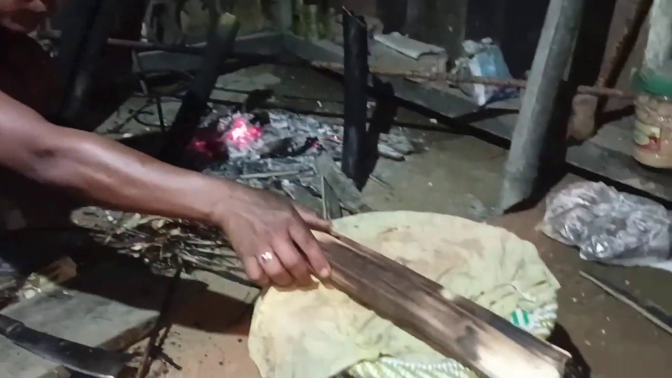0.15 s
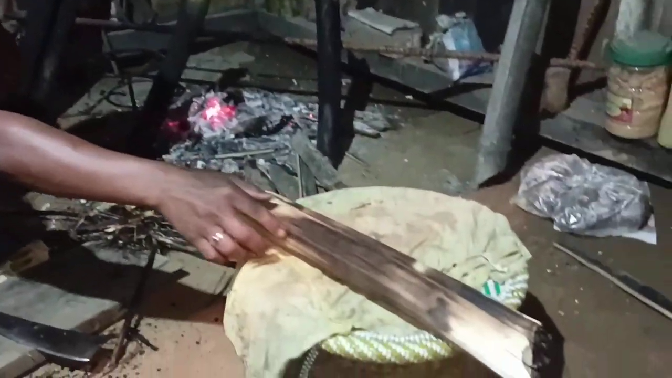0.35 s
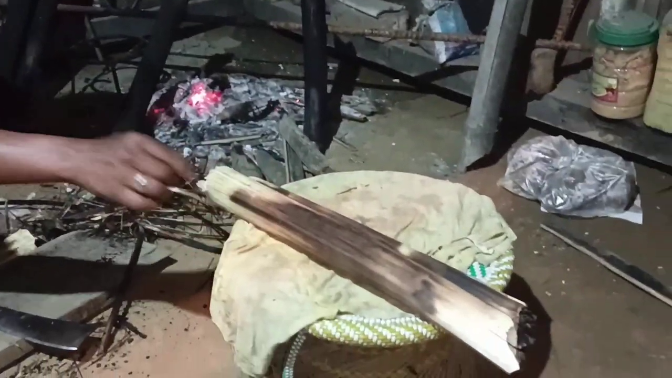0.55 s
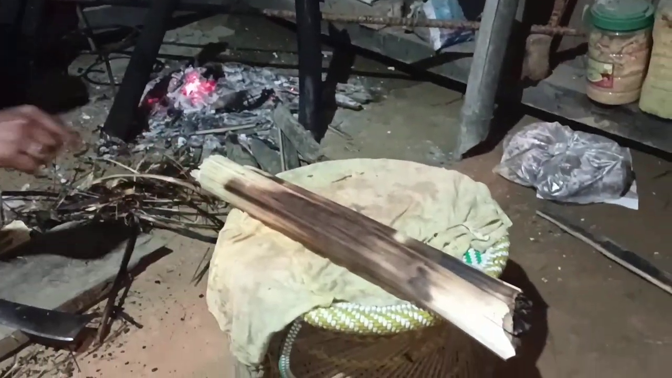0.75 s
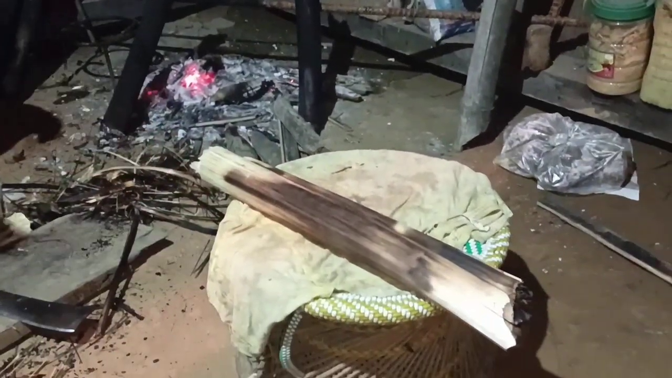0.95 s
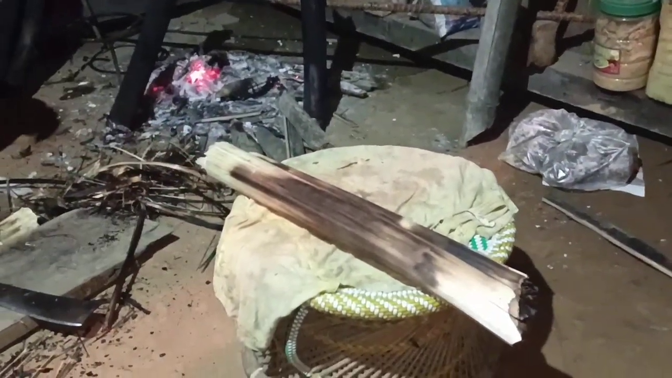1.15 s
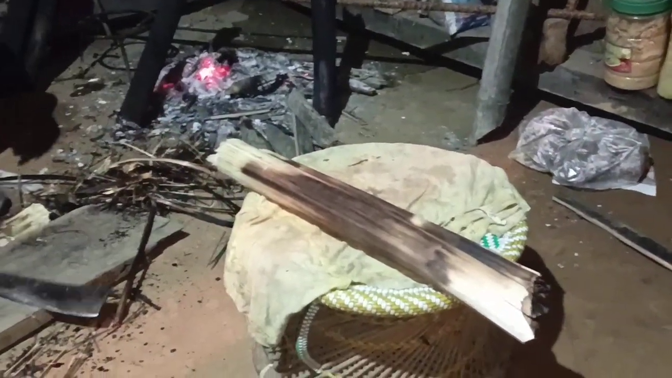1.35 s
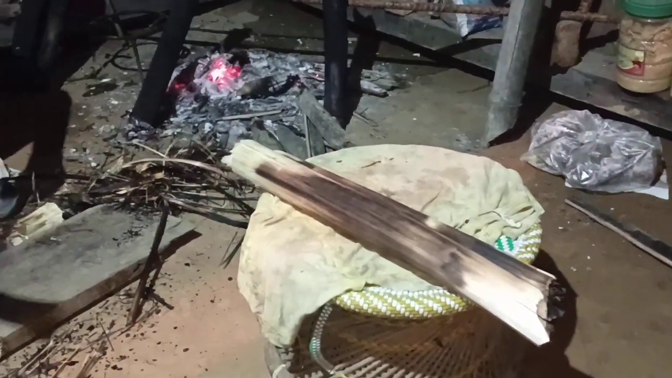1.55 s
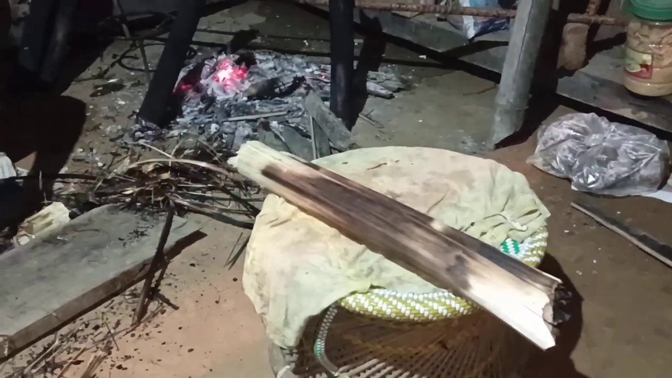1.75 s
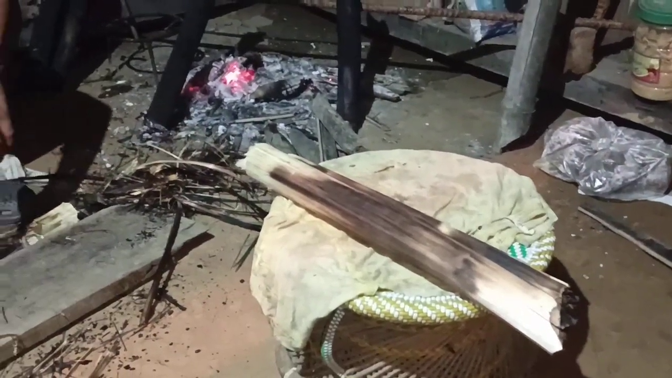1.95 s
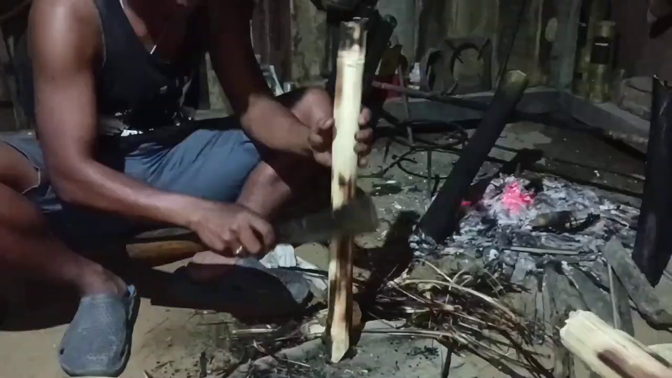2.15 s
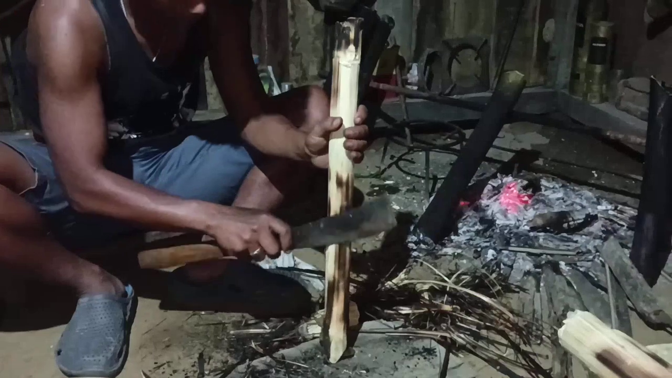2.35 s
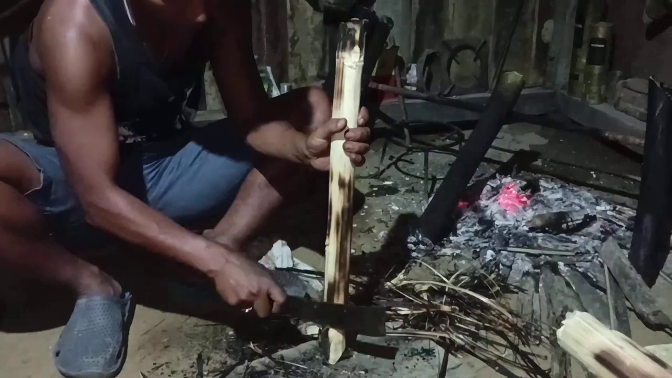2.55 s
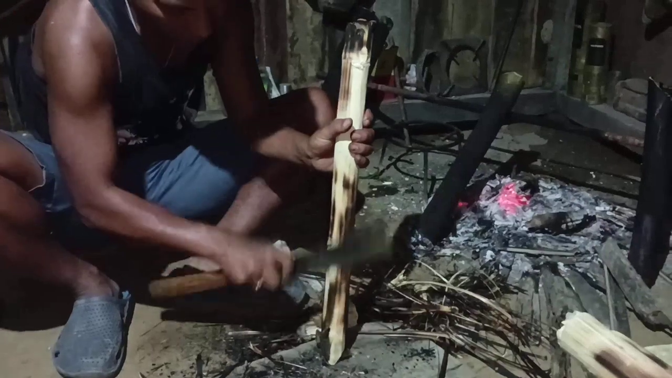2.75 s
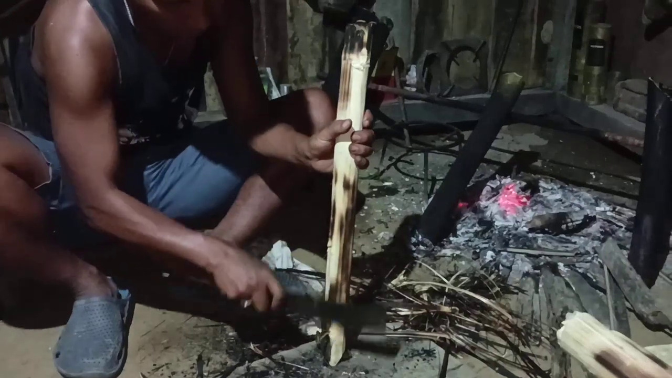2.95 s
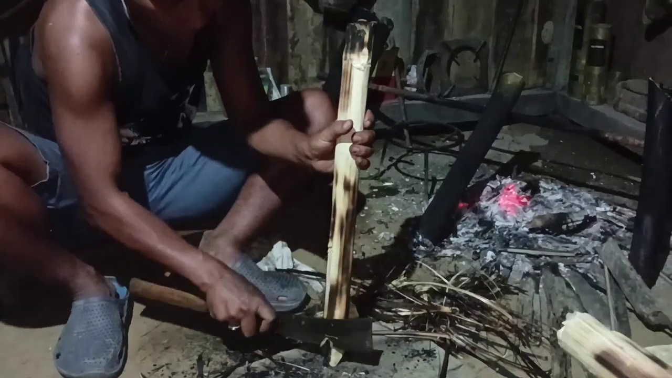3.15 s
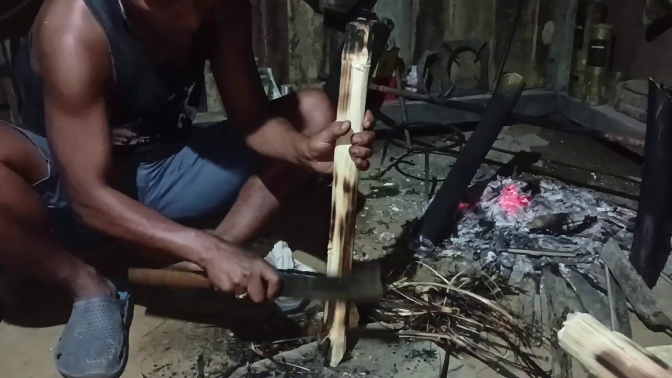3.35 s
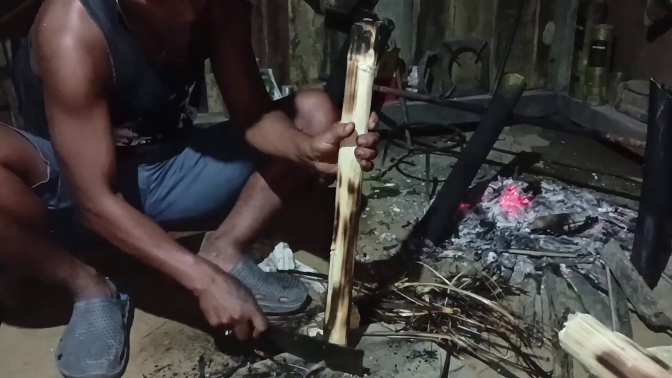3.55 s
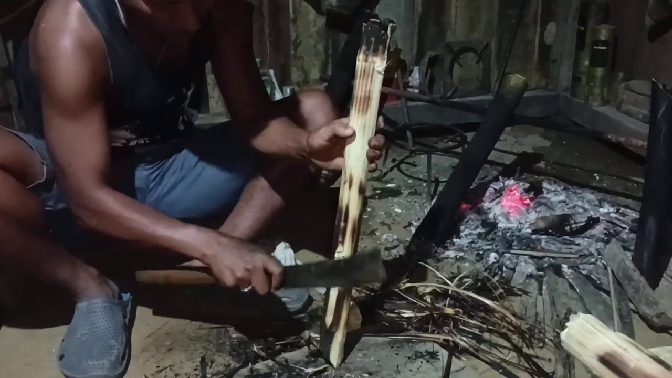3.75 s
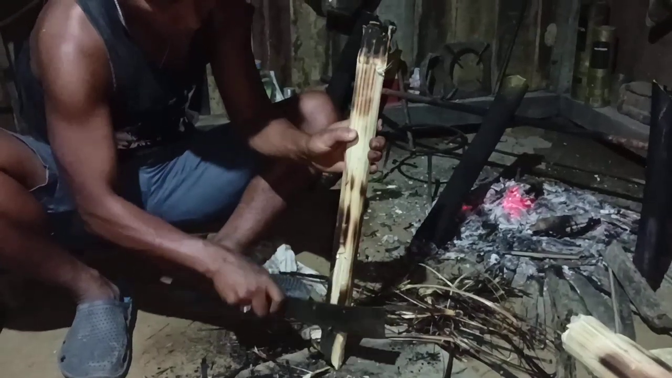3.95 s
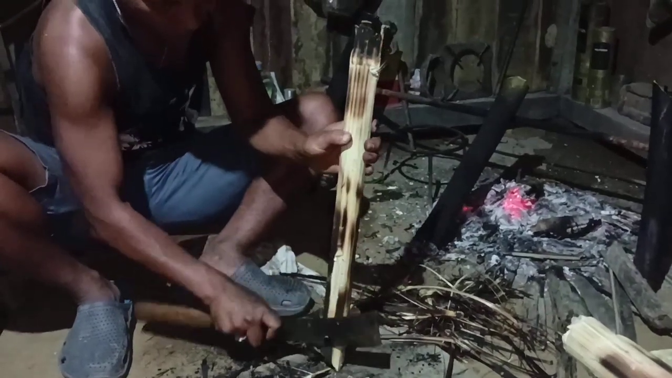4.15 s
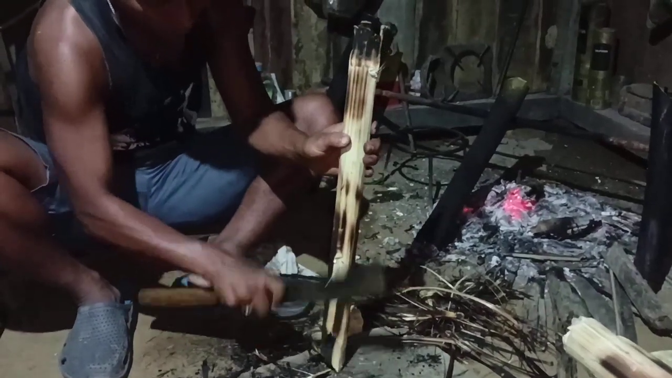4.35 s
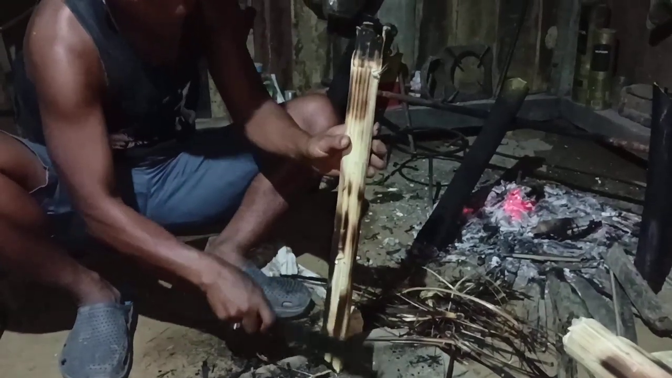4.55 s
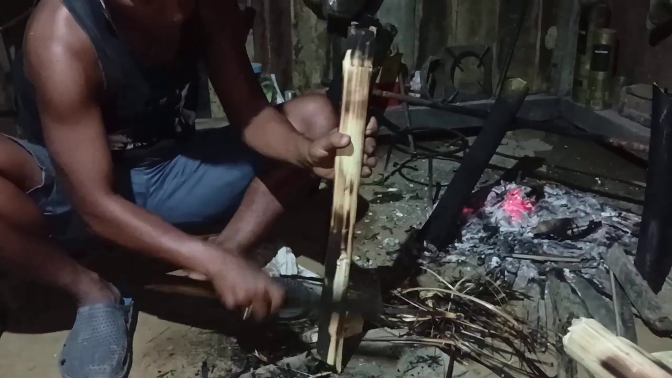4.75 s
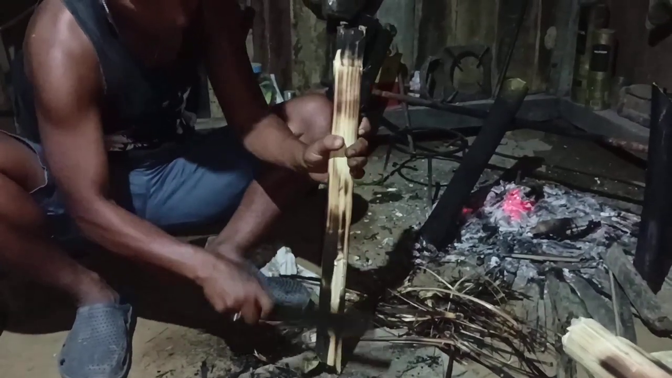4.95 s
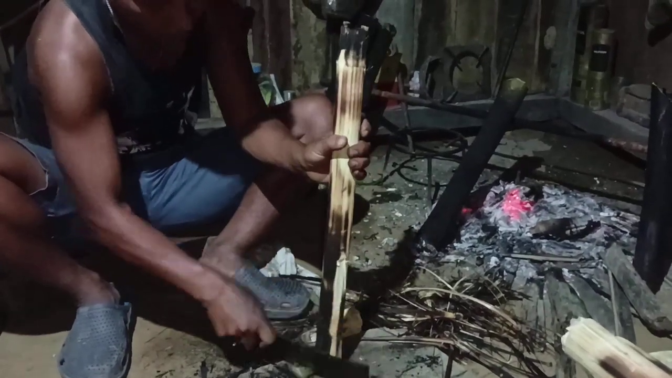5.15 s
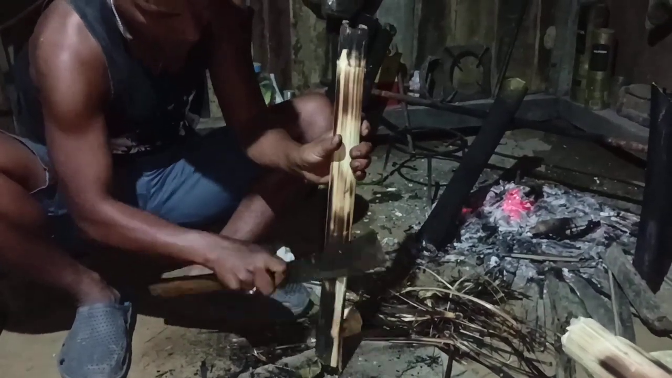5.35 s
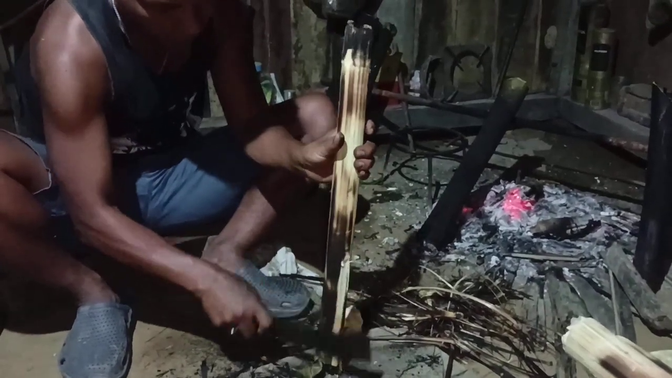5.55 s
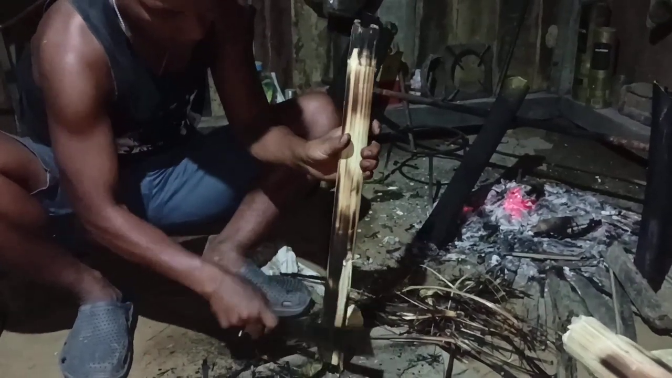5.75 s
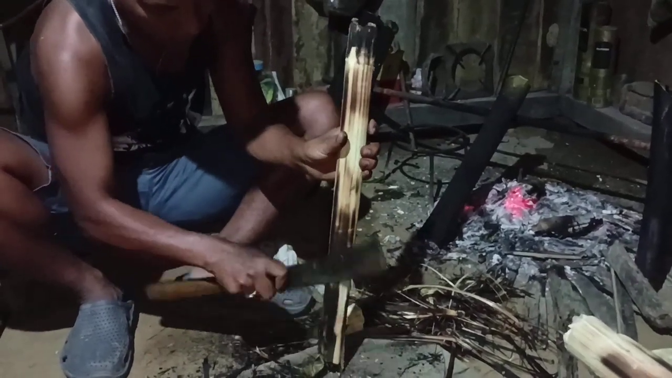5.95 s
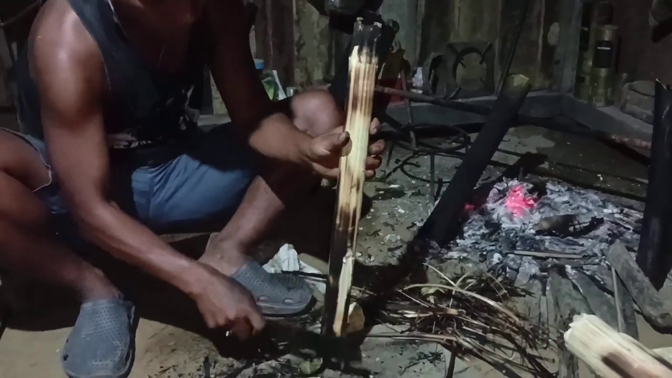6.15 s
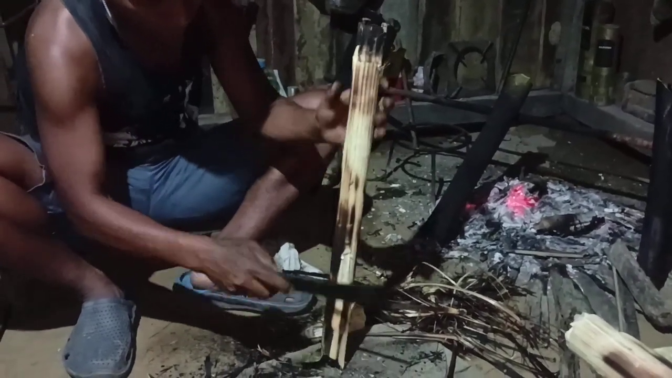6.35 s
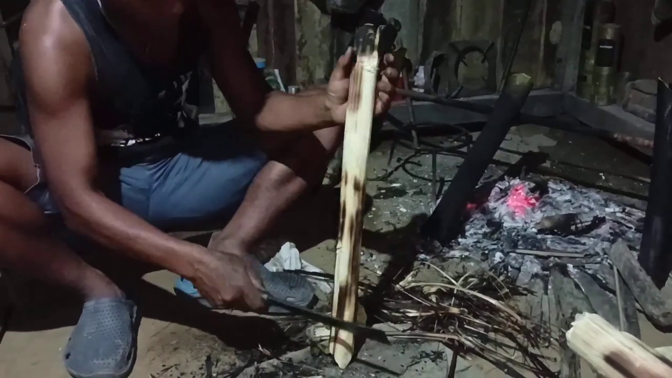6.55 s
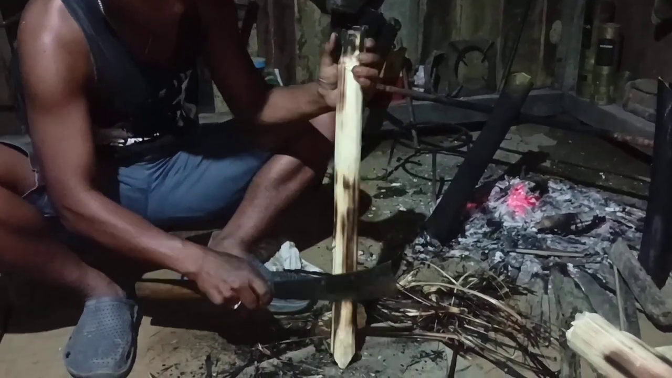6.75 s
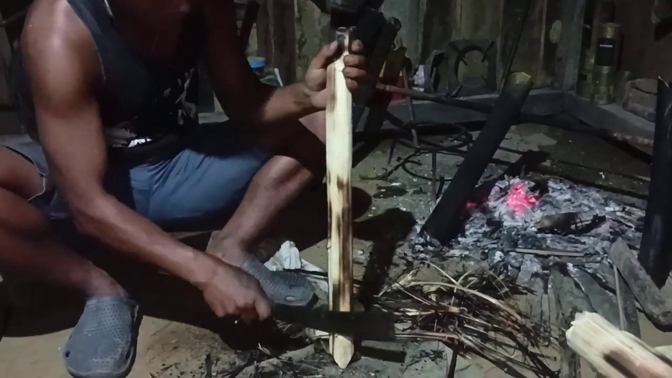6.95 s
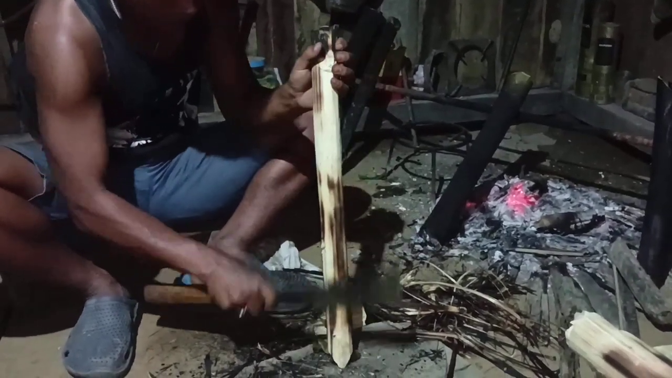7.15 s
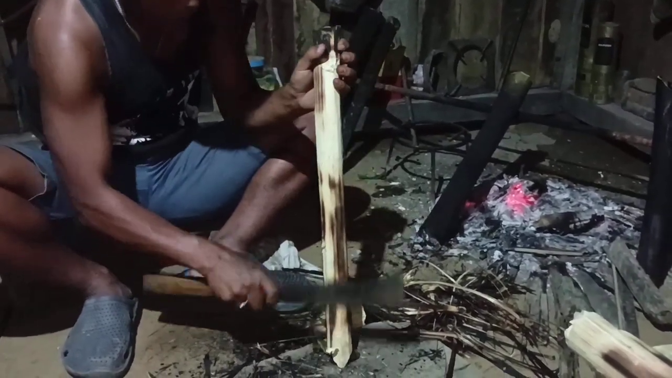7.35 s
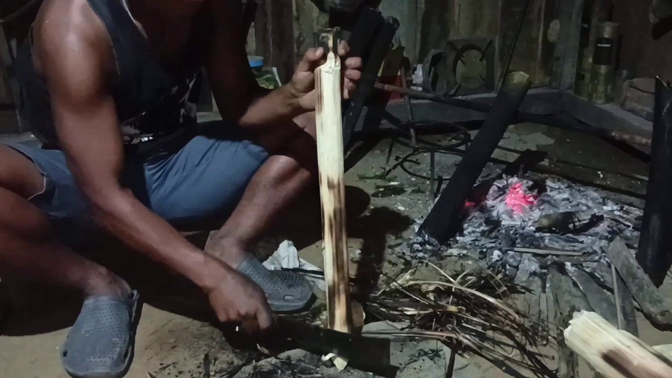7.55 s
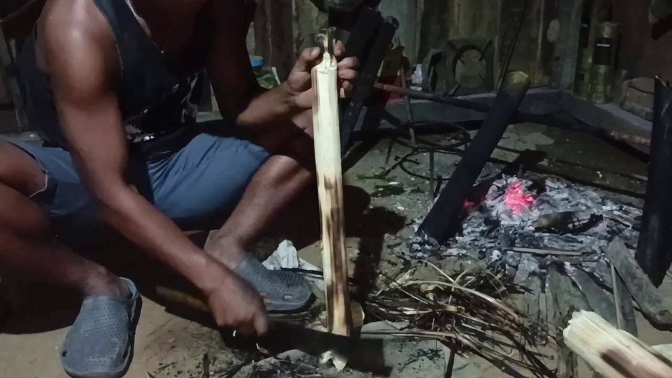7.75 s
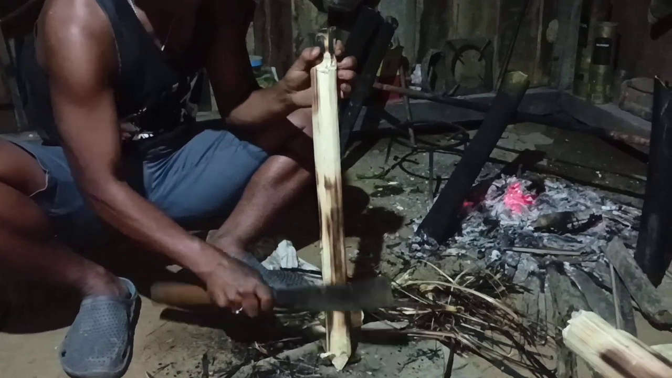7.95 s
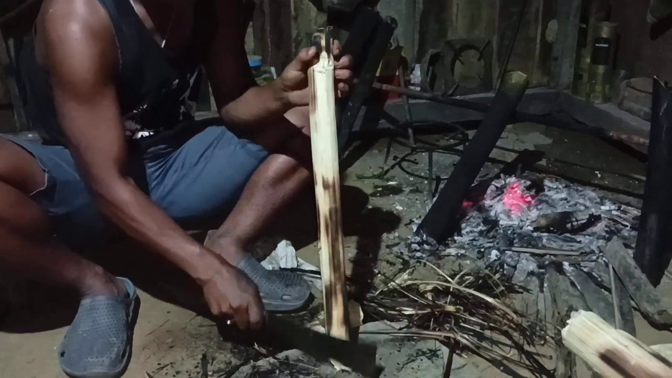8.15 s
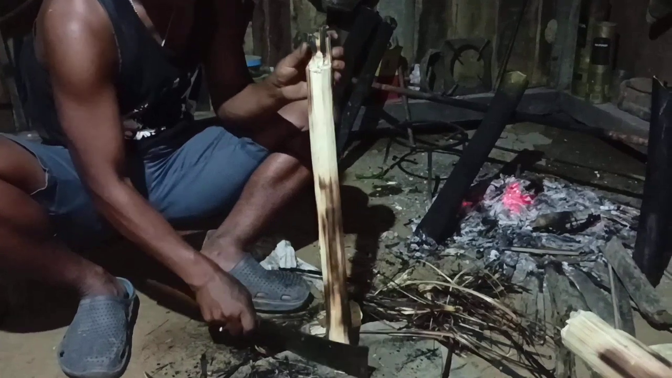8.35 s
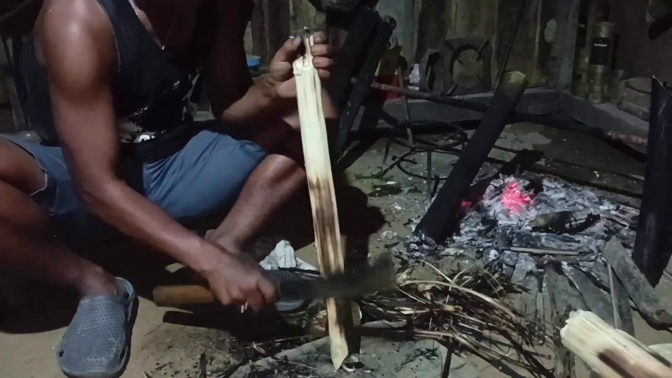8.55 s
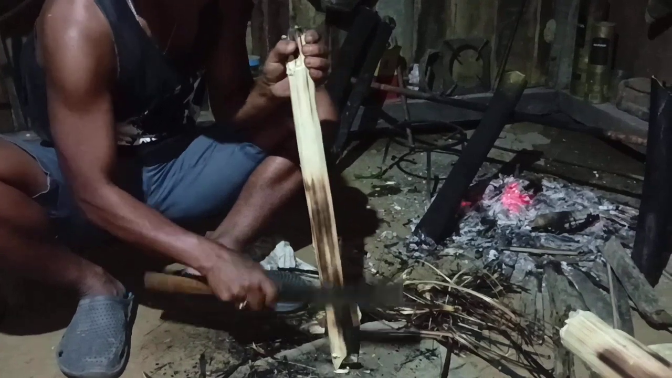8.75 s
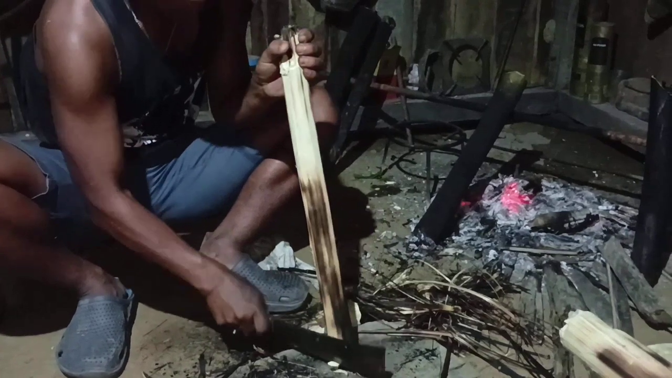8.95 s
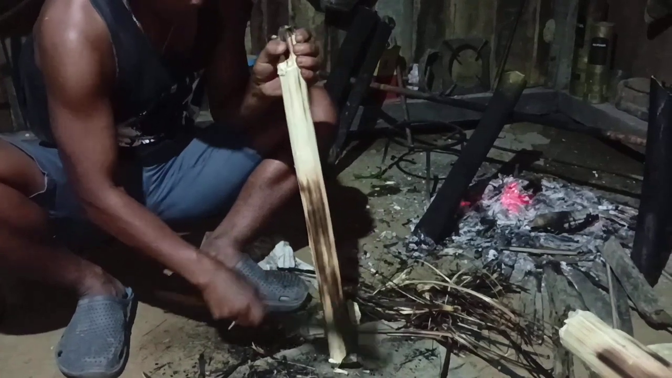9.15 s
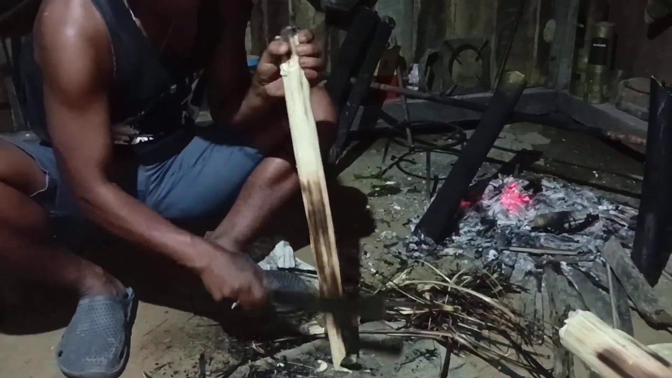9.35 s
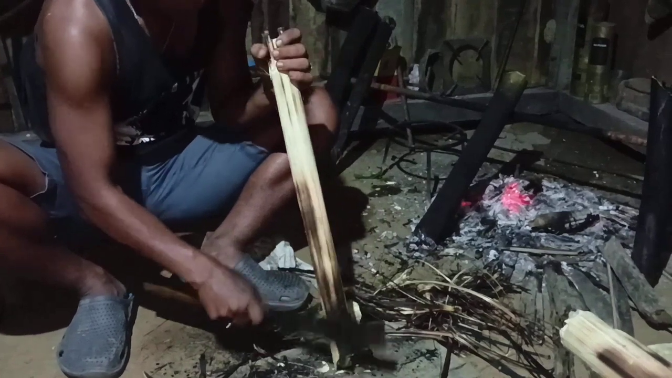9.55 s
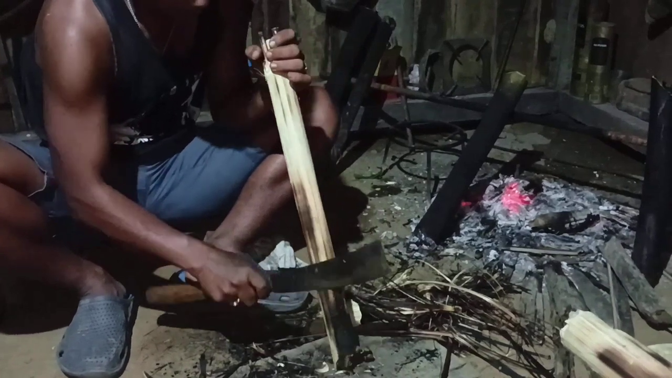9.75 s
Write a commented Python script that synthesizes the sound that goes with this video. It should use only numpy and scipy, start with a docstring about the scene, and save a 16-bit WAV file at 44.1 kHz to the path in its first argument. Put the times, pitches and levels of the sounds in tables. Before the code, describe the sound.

A heavy knife strips charred skin from a bamboo tube. After one opening knock, quiet, and a dropped-blade clank, there is a moment of complete silence; then irregular scrapes swell into dry cracks and woody hollow knocks, several very loud and clipped. The blade faintly sings, rice inside dampens the tube, and blows thud into the ground. Close microphone, small shelter, thin unsteady outdoor air.

```python
"""A large knife shaves charred skin off a bamboo tube on hard earth under a shelter: swelling scrapes of torn-fibre noise.
Blows crack the skin, ring the hollow tube's modes, shake the rice inside and thud; the hardest overload the microphone.
The knife is dropped once, ringing as steel, just before a short silence; a few soft bumps fall before that.
Behind lies the yard: unsteady airy hiss, far rumble and faint treble rustles, all shaped noise."""
import sys
import numpy as np
from scipy import signal
from scipy.fft import rfft, irfft, next_fast_len
from scipy.io import wavfile
from scipy.ndimage import uniform_filter1d, map_coordinates

SR = 44100
rng = np.random.default_rng(int(sys.argv[2]) if len(sys.argv) > 2 else 0)


def generate_wav(sig):
    """Save sig (samples, or channels by samples) to the path in sys.argv[1] as 16-bit PCM at SR."""
    pcm = np.round(np.clip(np.atleast_2d(sig).T, -1, 1) * 32767).astype(np.int16)
    wavfile.write(sys.argv[1], SR, pcm)


N = 436590


def amp(db):
    """Gain of a level in dB."""
    return 10 ** (np.asarray(db) / 20)


def decay(t, t60):
    """Exponential decay by 60 dB in t60 seconds."""
    return amp(-60 * t / t60)


def build_up(t, seconds):
    """Rise from 0 towards 1 with a time constant in seconds."""
    return 1 - np.exp(-t / seconds)


def unit(x):
    """x at rms 1."""
    return x / np.sqrt(np.mean(x ** 2) + 1e-20)


def along(points, hz):
    """Value at each frequency, from (Hz, value) points on a log axis."""
    point_hz, values = np.transpose(points)
    return np.interp(np.log(hz + 1), np.log(point_hz + 1), values)


def curves(rows):
    """One value per sample for each column after the time."""
    s, *columns = np.transpose(rows)
    return [np.interp(np.arange(N) / SR, s, column) for column in columns]


def filtered(x, response):
    """x times a response of frequency."""
    m = next_fast_len(len(x) + 8192)
    return irfft(rfft(x, m) * response(np.fft.rfftfreq(m, 1 / SR)), m)[:len(x)]


def noise(spectrum, size=N):
    """Noise of rms 1, coloured by (Hz, relative dB per Hz) points."""
    return unit(filtered(rng.standard_normal(size), lambda hz: amp(along(spectrum, hz))))


def wobble(rate):
    """A smooth random curve, rate knots a second."""
    knots = rng.standard_normal(int(N * rate / SR) + 4)
    return map_coordinates(knots, [np.arange(N) * rate / SR])


def patchy(x, depth_db):
    """Random patches of gain over time and frequency: the colour keeps shifting."""
    z = signal.stft(x, nperseg=512)[2]
    field = uniform_filter1d(rng.standard_normal(z.shape), size=5, axis=0)
    field = uniform_filter1d(field, size=9, axis=1)
    return unit(signal.istft(z * amp(depth_db * unit(field)), nperseg=512)[1][:N])


def ringing(modes, t, bloom, tilt_db=0):
    """Modes with random shifts of level and pitch, tilted in dB per octave; each builds up over bloom cycles."""
    ring = 0
    for hz, db, t60 in modes:
        level_db = db + tilt_db * np.log2(hz / 1200) + rng.normal(0, 2.0)
        tone = np.sin(2 * np.pi * hz * rng.normal(1, 0.0046) * t)
        ring = ring + amp(level_db) * decay(t, t60) * build_up(t, bloom / hz) * tone
    return ring


# Echo under the shelter's roof. Each row: frequency in Hz, t60 in seconds.
SHELTER_T60 = [(100, .3), (500, 0.28), (1400, 0.3), (3700, 0.14), (9000, .09)]


def shelter(x, size):
    """Echoes under the roof: a noise tail, 4 ms late, in which each frequency dies at its own speed."""
    hz, t, z = signal.stft(rng.standard_normal(size), SR, nperseg=256)
    fading = z * decay(t, along(SHELTER_T60, hz)[:, None])
    tail = signal.istft(fading, SR, nperseg=256)[1]
    return signal.fftconvolve(np.pad(x, (180, 0)), tail / np.linalg.norm(tail))[:len(x)]


# The yard's air through time. Each row: time in seconds, level in dB, airy top in dB over that level.
YARD_LEVELS = [(0, -56.5, -4), (.2, -61, -6.5), (.4, -79, 3.5), (.85, -73, -0.6), (1.05, -77, 0.6),
               (1.4, -66, -9), (1.83, -65, -9), (1.87, -50.5, -13), (1.92, -64, -9), (2.25, -76, -8.5),
               (2.4, -71.5, -5.5), (2.5, -60.5, -8), (6.4, -65, -3), (6.58, -61, -5), (6.7, -55, -6.5),
               (6.93, -65, -5), (7.1, -57, -2.5), (8.03, -68, 3), (8.1, -63.5, -16), (9.9, -57.5, -15)]
# Colour of the air's body. Each row: frequency in Hz, relative level in dB per Hz.
AIR_COLOUR = [(290, -35), (500, -6), (1490, -10), (1750, -6.5), (2600, 5.5), (2830, 0), (3530, -16),
              (4120, -20), (5000, -22), (6500, -53), (11000, -120)]
# Colour of its airy top. Each row: frequency in Hz, relative level in dB per Hz.
TOP_COLOUR = [(2650, -51), (4500, -21), (6150, -12.5), (7610, 11.5), (9160, -7.5), (10400, -12),
              (11500, -12.5), (14200, -12), (16000, -16.5)]
# Colour of the far rumble. Each row: frequency in Hz, relative level in dB per Hz.
RUMBLE_COLOUR = [(15, -46.5), (25, -17), (32, -13), (98, 5.5), (201, -3), (259, -1), (425, -8),
                 (900, -21.5), (1170, -40.5), (1980, -120)]
# The noise suppressor briefly pulls the background down. One row: centre in seconds, half width in seconds,
# depth in dB.
SUPPRESSOR_DIP = (5.1, .04, 35)


def yard():
    """Faint, slightly unsteady outdoor air over a far rumble: slowly wavering coloured noise."""
    air_db, top_db = curves(YARD_LEVELS)
    centre_s, half_width_s, depth_db = SUPPRESSOR_DIP
    nearness = np.clip(1 - np.abs(np.arange(N) / SR - centre_s) / half_width_s, 0, 1)
    air = amp(air_db + 1.2 * wobble(24)) * (noise(AIR_COLOUR) + amp(top_db) * noise(TOP_COLOUR))
    rumble = amp(-73.5 + 1.2 * wobble(18)) * noise(RUMBLE_COLOUR)
    return amp(-depth_db * nearness) * (air + rumble)


# Faint treble rustles. Each row: centre in seconds, level in dB, half width in seconds (to 1/e).
RUSTLE_SWELLS = [(.63, -80, .03), (.71, -80, .03), (.81, -76, .008), (.87, -77, .04), (.935, -78, .02),
                 (1.42, -79, .05), (1.48, -78, .02), (1.71, -76, .04), (6.6, -68, .1), (6.75, -68, .08)]
# Colour of a rustle. Each row: frequency in Hz, relative level in dB per Hz.
RUSTLE_COLOUR = [(3000, -30), (6000, -8), (9000, 0), (13000, -3), (16000, -8)]


def rustles():
    """Faint, grainy swells of treble: noise under bell-shaped gains with a fast flutter."""
    t = np.arange(N) / SR
    swell = sum(amp(db) * np.exp(-((t - s) / width) ** 2) for s, db, width in RUSTLE_SWELLS)
    return swell * amp(3 * wobble(200)) * noise(RUSTLE_COLOUR)


# Soft bumps nearby. Each row: start in seconds, level in dB, pitch in Hz.
SOFT_BUMPS = [(0.101, -21, 80.7), (0.297, -42, 83.4), (1.305, -41, 218), (1.709, -47, 107),
              (1.855, -29, 185)]
PUFF_COLOUR = [(60, 10.5), (500, -2), (1500, -17.5), (4000, -34)]  # (Hz, relative dB per Hz)


def bumps():
    """Something is set down softly: one low push, a short damped sine, and a puff of noise."""
    out, t = np.zeros(N + SR), np.arange(SR // 4) / SR
    for s, db, hz in SOFT_BUMPS:
        push = decay(t, 0.023) * np.sin(2 * np.pi * hz * t)
        puff = amp(-14) * decay(t, 0.097) * noise(PUFF_COLOUR, size=len(t))
        out[round(s * SR):][:len(t)] += amp(db) * build_up(t, .0006) * (push + puff)
    return out[:N]


# The knife is dropped and bounces. Each row: start in seconds, level in dB.
KNIFE_LANDINGS = [(1.928, -7), (1.969, -16)]
# Modes of the dropped knife. Each row: frequency in Hz, level in dB, t60 in seconds.
KNIFE_MODES = [(717, -6.5, 0.057), (2635, 1.5, 0.075), (2830, 5.5, 0.062), (3030, -6.5, 0.14),
               (3440, -13.5, 0.23), (4300, -22.5, 0.064), (4930, -30, 0.35), (5373, -20.5, 0.097),
               (6600, -10, 0.13), (7680, -22.5, 0.33), (8129, -18.5, 0.13), (9345, -31.5, 0.3),
               (11000, -28, 0.12), (11800, -43.5, 5.0)]
# The fallen knife rumbles on. One row: start in seconds, level in dB, t60 in seconds.
KNIFE_SLIDE = (1.94, -33, 1.5)
LANDING_COLOUR = [(250, -43.5), (600, -1.5), (1100, 3.5), (2800, 3.5), (4000, -23),
                  (7000, -19), (15000, -34.5)]  # (Hz, relative dB per Hz)


def drop():
    """Steel lands on something hard: a bright noise crack, the ring of the knife's modes, then a rumble."""
    out, t = np.zeros(N + SR), np.arange(SR // 4) / SR
    for s, db in KNIFE_LANDINGS:
        crack = decay(t, 0.029) * noise(LANDING_COLOUR, size=len(t))
        dry = amp(db) * (crack + amp(-10.5) * ringing(KNIFE_MODES, t, bloom=0.6))
        out[round(s * SR):][:len(t)] += dry + amp(-2) * shelter(dry, size=len(t))
    s, db, t60 = KNIFE_SLIDE
    unsteady = amp(db + 2.5 * wobble(60)[:len(t)])
    out[round(s * SR):][:len(t)] += unsteady * decay(t, t60) * noise(BODY_COLOUR, size=len(t))
    return out[:N]


# The tube's longest tone. One row: frequency in Hz, level in dB over the blow's tube level, t60 in seconds.
LINGER_TONE = (858, -58, 2.5)


def linger():
    """One thin, pure tone of the tube hangs on after each blow: a slowly decaying sine, gone in a second."""
    hz, over_db, t60 = LINGER_TONE
    out, t = np.zeros(N + SR), np.arange(SR) / SR
    for s, db, tube_db, *_ in KNIFE_BLOWS:
        tone = (1 - t) * np.sin(2 * np.pi * hz * t)
        out[round(s * SR):][:SR] += amp(db + tube_db + over_db) * decay(t, t60) * tone
    return out[:N]


# Blows of the knife. Each row: start in seconds, blow level in dB, then tube, rice and ground thud in dB
# over the blow, crack t60 in seconds, hardness as tilt of the tube's modes in dB per octave.
KNIFE_BLOWS = [(.0558, -14.5, -13, -21, -19, .054, 3), (2.4261, -27, -22, -30, -17, .044, 0),
               (2.4391, -25, -13, -35, -18.5, .043, 11), (2.5336, -27.5, -18, -11, -21, .033, -7),
               (2.5813, -13.5, -19, -15, -18.5, .097, 3), (2.886, -9.5, -11, -12, -14, .07, -6),
               (3.2029, -3, -26, -18, -26, .028, 0), (3.454, -16, -20, -34, -25, .03, 0),
               (3.5313, -24, -11, -12, -24, .04, 7), (3.5631, 4, -6, -23.5, -51, .021, 0),
               (3.9222, -20, -22.5, -5, -11, .11, -9), (4.1926, -11.5, -25.5, -11, -26, .045, -11),
               (4.4871, -15, -25, -24, -38, .014, -2), (4.5033, 11, -7, -22.5, -47, .048, 4.3),
               (4.6293, -26, -2.5, -25.5, -15, .063, -6), (4.8977, 3, .5, -18, -33, .043, .5),
               (5.136, -20, -26, -24, -32, .019, 7), (5.239, 1, -.5, -18, -36, .03, -.8),
               (5.3728, -22, -10.5, -26, -35, .051, 0), (5.5234, -19, -24.5, -18, -45, .04, 0),
               (5.697, -23.5, -25, -18, -30, .036, 0), (5.8226, -16, -26.5, -35, -41, .036, 6),
               (5.8452, -14, -32, -24, -34.5, .022, 0), (6.0142, -23.5, -29, -29, -35, .059, 6),
               (6.1729, 1.5, -3, -20, -37, .024, 1), (6.8683, -36, -23, -18, -22, .047, 2),
               (7.0182, -16.5, -20, -21, -16.5, .044, -12.5), (7.1112, -37, -20, -25, -13.5, .034, -3),
               (7.281, -5, -28, -35, -29, .025, -2), (7.5636, -17, -16, -24, -24, .033, -.5),
               (7.5766, -6.5, -25, -29, -14.5, .026, 9), (7.8431, -10, -21.5, -31, -30, .046, 4),
               (7.8515, -10.5, -17, -4.5, -13, .031, -.5), (8.0518, -30, -32, -20, -28, .033, 4),
               (8.125, -10, -18, -10.5, -22, .027, -6), (8.1638, -8, -.5, -5, -29, .023, -5.5),
               (8.3052, -38, -15, -20, -20, .04, -3), (8.4003, 6.5, -7, -21, -42.5, .023, .6),
               (8.7174, -18.5, -39, -10, -11, .035, -4), (8.8283, -31, -22, -36, -42, .04, -2),
               (8.9819, -6, -20, -20, -26, .022, -3), (9.1352, -26, -22, -25, -30, .03, 0),
               (9.2814, 0, 0, -13, -33, .05, -1.9), (9.5762, -23, -23, -31, -42, .027, 6),
               (9.8008, -29, -32, -30, -17, .03, 0)]
# Modes of the bamboo tube. Each row: frequency in Hz, level in dB, t60 in seconds.
TUBE_MODES = [(482, -13.5, 0.13), (555.7, -13.5, 0.12), (724.6, -8, .08), (852.6, -5.5, 0.15),
              (856, -31, 0.41), (953, -6.5, 0.066), (1000, -9.5, 0.081), (1164, -5.5, 0.12),
              (1209.3, -1, 0.074), (1260, -5.5, .09), (1335, -9, .08), (1399, -13, 0.023), (1578, -8, 0.11),
              (1875, -8.5, 0.095), (1963, -6, 0.11), (2030, -2, 0.03), (2055, -6, 0.064), (2134, -6, .09),
              (2258, -10.5, 0.089), (2357, -9, 0.07), (2420, -12, 0.024), (2652, -12, 0.038)]
# Colour of the cracking skin. Each row: frequency in Hz, relative level in dB per Hz.
CRACK_COLOUR = [(410, -16.5), (700, -12), (864, 6), (1050, -48.5), (1380, -7), (2160, 2.5), (2780, 2),
                (3650, -20.5), (4500, -21.5), (5850, -41.5), (9900, -120)]
# Colour of the thud in the earth. Each row: frequency in Hz, relative level in dB per Hz.
THUD_COLOUR = [(15, -61.5), (25, -22), (70, -7.5), (145, 4.5), (218, 0), (321, -8), (600, -3.5), (780, -36),
               (1320, -120)]
# Colours of the tube's dull knock and of the rice: (Hz, relative dB per Hz)
KNOCK_COLOUR = [(300, -54), (600, -7.5), (1200, 16.5), (2200, -17), (3500, -38)]
RICE_COLOUR = [(120, -27), (300, -7), (600, 9), (1200, -10.5), (2500, -57.5)]
SPLINTER_DB, SPLINTER_TOP_DB = -1.5, -22  # splinters over the crack; cap on blow level plus splinter level
BITE_DB = 14  # first tick over the crack


def blows():
    """Each blow cracks the skin, rings the tube, shakes the rice inside and thuds into the earth, slower to build."""
    out, t = np.zeros(N + SR), np.arange(SR * 2 // 5) / SR
    for s, db, tube_db, rice_db, thud_db, crack_t60, tilt_db in KNIFE_BLOWS:
        # the tube rattles on the ground
        chatter = amp(4.0 * map_coordinates(rng.standard_normal(100), [t * 150]))
        ring = chatter * ringing(TUBE_MODES, t, bloom=1.0, tilt_db=tilt_db)
        knock = decay(t, 0.047) * noise(KNOCK_COLOUR, size=len(t))
        tube = amp(tube_db) * (amp(-5.5) * ring + amp(-3.5) * knock)

        crack = decay(t, max(crack_t60, .005)) * noise(CRACK_COLOUR, size=len(t))
        # the edge first bites with one sharp tick
        bite = amp(BITE_DB) * decay(t, .005) * np.sin(2 * np.pi * 2300 * t)
        splinter_db = min(SPLINTER_DB, SPLINTER_TOP_DB - db)
        splinter = amp(splinter_db) * decay(t, .01) * noise(HISS_COLOUR, size=len(t))
        skin = amp(-7) * (crack + bite + splinter)

        rice = amp(rice_db) * decay(t, 0.11) * build_up(t, 0.0092) * noise(RICE_COLOUR, size=len(t))
        thud = amp(thud_db) * decay(t, 0.15) * build_up(t, 0.0064) * noise(THUD_COLOUR, size=len(t))
        dry = amp(db) * build_up(t, .0003) * (tube + skin + rice + thud)
        out[round(s * SR):][:len(t)] += dry + amp(-10.5) * shelter(dry, size=len(t))
    return out[:N]


# Scrapes of the blade. Each row: time of the peak in seconds, hiss level in dB, swell in seconds, swell in dB,
# seconds to fade by FADE_DB, rasp in dB over the hiss.
BLADE_SCRAPES = [(0.06, -30.9, 0.012, 30.0, 0.092, 12.9), (1.93, -28.7, 0.002, 1.0, 0.07, 11.0),
                 (2.034, -41.8, 0.038, 18.2, 0.326, 13.6), (2.43, -54.3, 0.004, 1.0, 0.4, 13.9),
                 (2.578, -29.8, 0.1, 26.6, 0.078, 1.0), (2.716, -40.3, 0.054, 20.6, 0.3, -1.0),
                 (2.88, -38.3, 0.1, 7.9, 0.03, -0.1), (2.888, -26.6, 0.002, 1.0, 0.073, 2.4),
                 (3.026, -50.1, 0.03, 21.0, 0.108, -0.1), (3.196, -47.0, 0.112, 1.4, 0.02, 2.6),
                 (3.203, -34.7, 0.002, 1.0, 0.1, 1.6), (3.383, -51.3, 0.044, 33.0, 0.07, -3.6),
                 (3.522, -46.2, 0.068, 2.4, 0.03, 7.0), (3.538, -24.5, 0.016, 16.0, 0.025, -2.1),
                 (3.79, -60.6, 0.2, 8.9, 0.03, 4.3), (3.8, -47.4, 0.002, 1.0, 0.2, 3.8),
                 (3.924, -28.3, 0.052, 26.3, 0.068, -2.8), (4.074, -47.1, 0.044, 29.5, 0.081, -6.1),
                 (4.185, -42.2, 0.075, 17.1, 0.02, -7.1), (4.192, -28.9, 0.002, 1.0, 0.071, 2.2),
                 (4.352, -42.0, 0.012, 6.0, 0.08, 3.0), (4.48, -48.5, 0.088, 9.1, 0.02, -2.5),
                 (4.492, -15.9, 0.006, 22.0, 0.01, -6.5), (4.506, -20.2, 0.003, 9.0, 0.031, 1.4),
                 (4.826, -47.5, 0.196, 4.1, 0.05, 6.7), (4.858, -34.3, 0.032, 14.6, 0.074, 2.6),
                 (4.9, -38.5, 0.003, 4.0, 0.044, 9.1), (5.004, -46.2, 0.066, 18.5, 0.112, 2.4),
                 (5.234, -33.4, 0.1, 13.9, 0.027, 5.6), (5.324, -42.4, 0.048, 25.2, 0.091, 0.8),
                 (5.424, -40.7, 0.054, 0.3, 0.12, 1.9), (5.566, -22.0, 0.12, 25.7, 0.067, -0.7),
                 (5.648, -42.5, 0.014, 8.0, 0.062, 0.4), (5.708, -37.2, 0.018, 5.0, 0.135, 9.4),
                 (5.846, -23.7, 0.084, 25.6, 0.067, 3.2), (5.958, -50.7, 0.032, 9.2, 0.087, 3.0),
                 (6.151, -28.7, 0.146, 20.8, 0.016, 3.5), (6.175, -41.5, 0.003, 5.0, 0.013, 14.2),
                 (7.018, -34.4, 0.058, 25.3, 0.066, 0.9), (7.156, -40.2, 0.078, 21.8, 0.11, -3.5),
                 (7.272, -44.9, 0.064, 13.9, 0.02, -5.0), (7.283, -27.8, 0.002, 1.0, 0.078, 10.1),
                 (7.46, -41.3, 0.05, -0.6, 0.13, -2.4), (7.565, -38.0, 0.06, 17.1, 0.028, 1.0),
                 (7.578, -27.9, 0.002, 1.0, 0.072, 14.7), (7.753, -42.0, 0.082, 24.6, 0.094, 1.1),
                 (7.855, -25.1, 0.056, 25.5, 0.049, 4.4), (8.089, -52.9, 0.038, -3.8, 0.05, 6.7),
                 (8.129, -17.2, 0.04, 33.0, 0.038, 2.5), (8.39, -50.8, 0.17, 14.2, 0.021, 0.1),
                 (8.41, -54.0, 0.002, 1.0, 0.089, 16.0), (8.59, -36.2, 0.126, 30.7, 0.13, 1.2),
                 (8.696, -19.9, 0.06, 24.1, 0.077, -3.5), (8.834, -36.1, 0.006, 1.5, 0.157, 7.6),
                 (8.974, -40.4, 0.04, -0.4, 0.02, -3.9), (8.982, -28.0, 0.002, 1.0, 0.08, 11.5),
                 (9.146, -37.7, 0.07, 25.9, 0.138, 7.3), (9.27, -45.2, 0.04, -2.3, 0.028, 3.2),
                 (9.454, -34.2, 0.084, 30.3, 0.24, 0.2), (9.652, -22.1, 0.08, 22.8, 0.116, 0.9),
                 (9.82, -33.2, 0.02, 4.0, 0.081, -3.3), (9.899, -26.7, 0.03, 22.0, 0.05, -3.0)]
FADE_DB = 30
RASP_LAGS = .08  # dB that the rasp gains on the hiss for each dB under the peak


def scrapes():
    """Gains of hiss and rasp: the edge touches, swells to its peak and fades; scrapes add in power."""
    hiss, rasp, t = np.zeros(N + SR), np.zeros(N + SR), np.arange(SR // 2) / SR
    for s, db, swell_s, swell_db, fade_s, rasp_db in BLADE_SCRAPES:
        swelling_db = swell_db * (1 - t / swell_s)
        fading_db = FADE_DB * (t - swell_s) / fade_s
        under_db = np.where(t < swell_s, swelling_db, fading_db)
        start = round((s - swell_s) * SR)
        at = slice(start, start + len(t))
        hiss[at] += amp(db - under_db) ** 2
        rasp[at] += amp(db + rasp_db - (1 - RASP_LAGS) * under_db) ** 2
    return np.sqrt(hiss[:N]), np.sqrt(rasp[:N])


# Resonances of the singing steel. Each row: frequency in Hz, width in Hz, relative level in dB.
BLADE_RESONANCES = [(2670, 60, 0), (3100, 50, -3), (4300, 30, -9), (4820, 30, -12), (5660, 30, -11),
                    (5970, 30, -10), (6950, 30, -4), (7250, 30, -6), (7600, 30, -2), (7950, 30, -5),
                    (8330, 30, -2), (8750, 30, -5), (9730, 25, -1), (10700, 30, -9), (11800, 25, -2),
                    (12500, 25, -8), (13780, 25, -9)]
# Colour of the hiss of torn skin. Each row: frequency in Hz, relative level in dB per Hz.
HISS_COLOUR = [(2120, -20), (3600, -26), (4300, -12.5), (5280, -7.5), (5880, -2), (8620, 1.5),
               (10600, -7.5), (12200, -8), (15600, -17), (16100, -21), (16500, -101)]
# Colour of the rougher rasp. Each row: frequency in Hz, relative level in dB per Hz.
RASP_COLOUR = [(760, -49), (1300, -30), (1430, -24.5), (1760, -2.5), (2530, 3.5), (2660, 7.5), (3100, 3.5),
               (3680, -11), (4200, -12), (5460, -49.5), (9240, -120)]
# Colour of the wall's body. Each row: frequency in Hz, relative level in dB per Hz.
BODY_COLOUR = [(30, -48.5), (70, -17.5), (150, -11), (350, -4.5), (700, -7.5), (1500, -3), (2100, -36.5),
               (3500, -120)]
# level of the wall's body when hiss and rasp are at 0 dB; dB it grows for each dB of hiss and of rasp
BODY_DB, BODY_GROWS, BODY_RASP = -26, .45, .25


def steel(hz):
    """Response of the blade: a sum of resonant bands."""
    return sum(amp(db) * 1j * hz * width / (centre ** 2 - hz ** 2 + 1j * hz * width)
               for centre, width, db in BLADE_RESONANCES)


def shaving():
    """The edge tears fibres: rough noise in the skin and the wall, which also sets the blade singing."""
    hiss, rasp = scrapes()
    pressure = unit(amp(1.6 * wobble(35)))  # the edge bites unevenly
    # single fibres break, about 500 a second
    snaps = (rng.random(N) < 500 / SR) * rng.exponential(0.53, N)
    snapping = np.convolve(snaps, decay(np.arange(300) / SR, 0.024))[:N]
    tearing = unit(amp(2.2 * wobble(300)) + snapping)

    singing = amp(13) * filtered(hiss * pressure * tearing * rng.standard_normal(N), steel)
    hissing = hiss * patchy(noise(HISS_COLOUR), depth_db=3)
    rasping = rasp * amp(0.56 * wobble(30)) * patchy(noise(RASP_COLOUR), depth_db=2.5)
    body_gain = hiss ** BODY_GROWS * rasp ** BODY_RASP * amp(BODY_DB + 2.0 * wobble(30))
    body = body_gain * noise(BODY_COLOUR)
    dry = pressure * (tearing * (hissing + rasping) + body) + singing
    return dry + amp(-13.5) * shelter(dry, size=SR // 2)


def suppressed(x, below_db, depth_db, ratio):
    """A noise suppressor: pulls x down where its power over 20 ms, 5 ms of it ahead, sinks under a threshold."""
    power = np.convolve(x ** 2, np.ones(900) / 900)[200:][:N]
    level_db = 10 * np.log10(np.abs(power) + 1e-12)
    return x * amp(np.clip(ratio * (level_db - below_db), -depth_db, 0))


# Complete silence. One row: start in seconds, end in seconds.
SILENCE = (2.108, 2.25)
WORK_RESUMES_S = 2.42


def scene():
    """Knife work passes the threshold suppressor; all fall silent, and the work resumes after the yard."""
    t = np.arange(N) / SR
    silent_from, silent_to = SILENCE
    playing = (t < silent_from) | (t > silent_to)
    working = (t < silent_from) | (t > WORK_RESUMES_S)
    work = suppressed(shaving() + blows() + drop(), below_db=-49.5, depth_db=11, ratio=3.4)
    faint = bumps() + linger() + yard() + rustles()
    return ((work * working + faint) * playing)[None]


TOP_HZ = 15700  # band limit


def record(dry):
    """The microphone loses deep bass and overloads on the hardest knocks; nothing is kept above the band limit."""
    thin = signal.sosfilt(signal.butter(3, 68, "highpass", fs=SR, output="sos"), dry[0])
    clipped = thin / (1 + np.abs(thin / .95) ** 8) ** (1 / 8)  # bends over sharply near .95
    # a gentle 45 Hz high-pass together with the band limit
    return filtered(clipped, lambda hz: (hz < TOP_HZ) * 1j * hz / (45 + 1j * hz))[None]


dry = scene()
out = record(dry)
generate_wav(out)
```